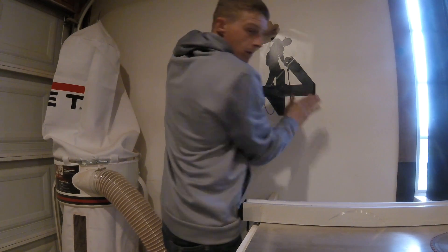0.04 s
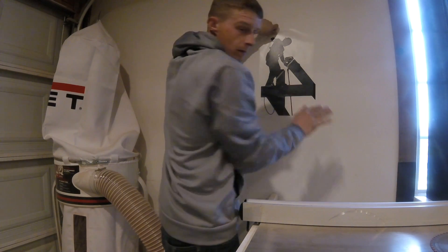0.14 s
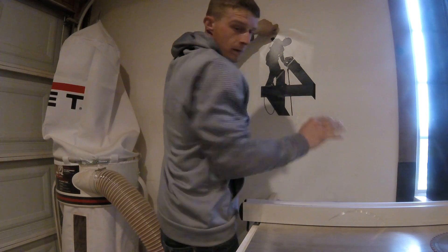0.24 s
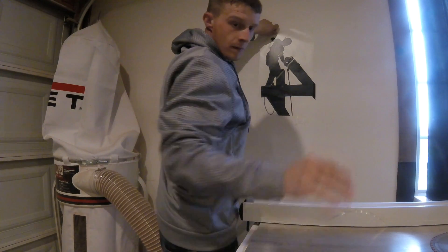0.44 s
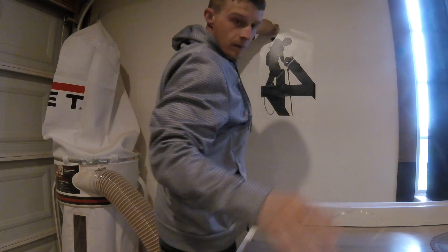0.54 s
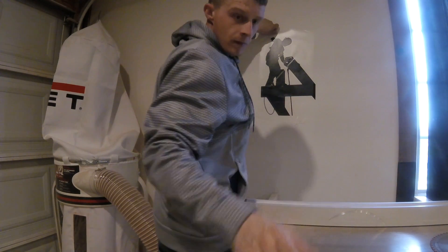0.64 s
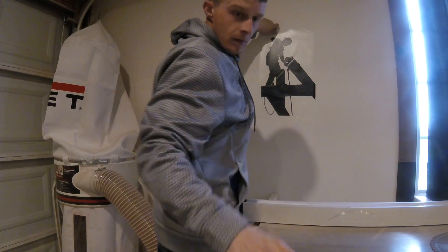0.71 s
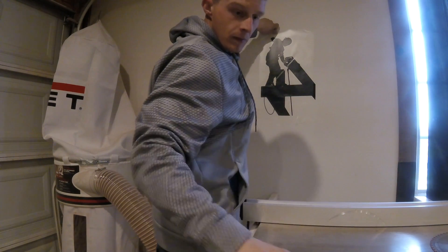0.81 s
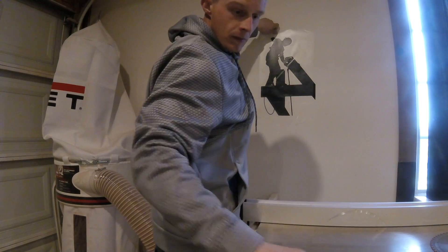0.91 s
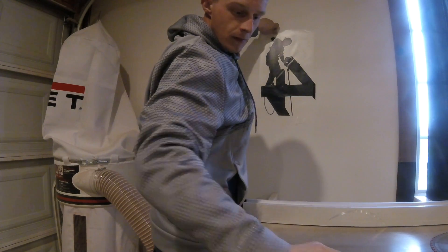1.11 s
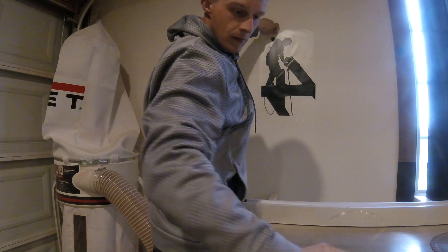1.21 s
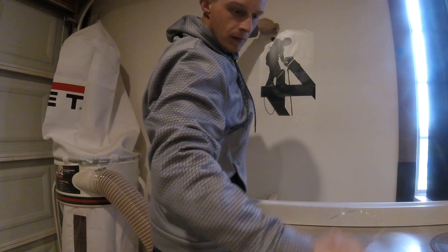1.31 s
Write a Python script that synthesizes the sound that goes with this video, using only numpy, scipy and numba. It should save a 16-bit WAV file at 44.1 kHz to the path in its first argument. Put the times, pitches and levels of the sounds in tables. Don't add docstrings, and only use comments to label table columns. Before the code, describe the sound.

One hollow palm slap with a reverberant tail comes first, then near the end crackling stiff paper, a tiny squeak and dull bench knocks, heard close to a small microphone in a humming, echoing garage.

```python
import sys
import numpy as np
from scipy import signal
from scipy.fft import rfft, irfft
from scipy.io import wavfile
from scipy.ndimage import uniform_filter1d
from numba import njit

SR = 44100
rng = np.random.default_rng(int(sys.argv[2]) if len(sys.argv) > 2 else 0)


def convert_level_to_amplitude(level_db):
    exponent = np.asarray(level_db, float) / 20
    return 10 ** exponent


def put_to_file(sound):
    columns = np.atleast_2d(sound).T
    safe = np.clip(columns, -1, 1)
    whole_steps = np.round(safe * 32767)
    wavfile.write(sys.argv[1], SR, whole_steps.astype(np.int16))


N = 59535


def level(x, db):
    return x * convert_level_to_amplitude(db) / np.sqrt(np.mean(x ** 2))


def colour(x, points):
    hz, db = np.array(points, float).T
    f = np.maximum(np.fft.rfftfreq(len(x), 1 / SR), 1)
    gain = convert_level_to_amplitude(np.interp(np.log(f), np.log(hz), db))
    return irfft(rfft(x) * gain, len(x))


def band(x, hz, width_hz):
    return signal.lfilter(*signal.iirpeak(hz, hz / width_hz, fs=SR), x)


def walk(rate):
    hold = int(SR / rate)
    steps = np.repeat(rng.standard_normal(N // hold + 1), hold)
    wander = uniform_filter1d(uniform_filter1d(steps, hold), hold)[:N]
    return wander / wander.std()


@njit
def rings(n, at, hz, t60, size, sr):
    out = np.zeros(n)
    for k in range(len(at)):
        first = int(at[k] * sr) + 1
        turn = np.exp((2j * np.pi * hz[k] - np.log(1000.) / t60[k]) / sr)
        z = size[k] * turn ** (first - at[k] * sr)
        for i in range(first, min(n, first + int(t60[k] * sr))):
            out[i] += z.imag
            z *= turn
    return out


def strikes(rows):
    start, db, hz, t60 = np.array(rows, float).T
    return rings(N, start, hz, t60, convert_level_to_amplitude(db), 1. * SR)


# start in seconds, peak in dB, ring in Hz, t60 in seconds.
SLAP_CONTACTS = [(.1905, -30.5, 300, 0.055), (0.2027, -29, 700, 0.022), (.2035, -17.5, 1340, 0.018),
                 (0.203, -26.5, 600, 0.066), (.2085, -18.5, 808, 0.038), (.2105, -18.5, 1253, 0.049),
                 (0.2121, -14, 1850, 0.015), (.2138, -24, 1320, 0.012), (.2155, -21, 1585, 0.02),
                 (0.2164, -16, 1450, 0.031), (.2205, -39, 1010, 0.016), (.2060, -28.5, 370, 0.21)]
# ring in Hz, level in dB, t60 in seconds.
HAND_HOLLOWS = [(265, -13.5, 0.027), (370, -12, 0.023), (600, -10.5, 0.032), (894, 0.5, 0.027),
                (1080, -8.5, 0.0081), (1366, 5, 0.021), (1623, 3, 0.016), (2100, -8.5, .012),
                (2383, -6, 0.015), (3080, -6, 0.0078), (3975, -12.5, 0.008), (6480, -11.5, 0.0016)]
# pitch in Hz, peak in dB, start in seconds, rise in seconds.
ROOM_BOOMS = [
    (89.6, -38.5, 0.208, 0.051),
    (148, -38, 0.231, 0.039),
    (386.8, -41, 0.212, 0.04),
    (97.3, -44.5, .32, 0.027),
]


def slap(t):
    crack_hz, crack_width_hz, crack_db = 2600, 1530, -31.5
    crack_s, crack_rise_s = 0.1976, 0.014
    u = np.maximum(t - crack_s, 0) / crack_rise_s
    air = band(rng.standard_normal(N), crack_hz, crack_width_hz)
    air = band(air, crack_hz, 2 * crack_width_hz)
    crack = convert_level_to_amplitude(crack_db) * level(air, 0) * u * np.exp(1 - u)

    walls_s, walls_db = 0.207, -27.5
    walls = np.zeros(N)
    for hz, db, t60 in HAND_HOLLOWS:
        hollow = strikes([(walls_s, db, hz, t60)])
        walls += signal.fftconvolve(hollow, room(t))[:N]
    early = walls[int(.25 * SR):int(.3 * SR)]
    walls = walls * convert_level_to_amplitude(walls_db) / early.std()

    x = strikes(SLAP_CONTACTS) + crack + walls
    x = signal.sosfilt(signal.butter(3, [163, 7800], "band", fs=SR, output="sos"), x)
    for hz, db, start, rise in ROOM_BOOMS:
        v = np.maximum(t - start, 0) / rise
        x = x + convert_level_to_amplitude(db) * (v * np.exp(1 - v)) ** 2 * np.sin(2 * np.pi * hz * t)
    return x


# time in seconds, level in dB, tilt in dB either side of 2 kHz.
PAPER_DRAG = [(1.038, -58, 6), (1.085, -50, 3.5), (1.11, -44.5, 6), (1.148, -45, 5), (1.175, -47.5, 4),
              (1.206, -49, 7), (1.26, -42, -0.5), (1.288, -56, -9), (1.35, -47.5, -3)]
# frequency in Hz, gain in dB.
PAPER_COLOUR = [(200, -3), (300, -0.5), (880, -5), (1080, 0), (1900, -1.5), (3900, -4.5), (4900, -12.5),
                (9000, -18)]


def paper(t):
    start, db, tilt = np.array(PAPER_DRAG).T
    drag = convert_level_to_amplitude(np.interp(t, start, db, left=-120)) * np.clip((t - start[0]) / 0.032, 0, 1)

    grains_per_s, grain_spread_db, grain_cycles = 1200, 3, 1.1
    when, pitch, size, sign = rng.random((int(grains_per_s * N / SR), 4)).T
    hz = 500 * 2 ** (4.1 * pitch)
    size = convert_level_to_amplitude(-grain_spread_db * np.log(size + 1e-6)) * np.sign(sign - .5) * hz / 2000
    grains = rings(N, when * N / SR, hz, 3 * grain_cycles / hz, size, 1. * SR)

    scrape_db, flicker_db = 9, 0.8
    raw = level(grains, 0) + level(rng.standard_normal(N), scrape_db)
    raw = level(colour(raw, PAPER_COLOUR), 0) * convert_level_to_amplitude(flicker_db * walk(59.3))
    low = signal.lfilter(*signal.butter(1, 2000, fs=SR), raw)
    lean = np.interp(t, start, tilt)
    x = drag * (low * convert_level_to_amplitude(-lean) + (raw - low) * convert_level_to_amplitude(lean)) + creases(t)
    return signal.sosfilt(signal.butter(3, 8100, fs=SR, output="sos"), x)


# start in seconds, peak in dB, pitch in Hz, t60 in seconds.
PAPER_CREASES = [(1.084, -43, 1070, 0.0076), (1.105, -41, 3600, 0.0055), (1.111, -37, 2230, 0.005),
                 (1.128, -33, 2440, .005), (1.138, -32, 2600, 0.0056), (1.146, -36, 2180, 0.0051),
                 (1.149, -33, 1090, 0.018), (1.2005, -31, 3270, .006), (1.2035, -34, 1130, 0.017),
                 (1.244, -32, 3400, 0.0057), (1.255, -31, 3860, 0.0085), (1.261, -33, 6800, .004),
                 (1.271, -40, 3720, 0.0037), (1.297, -29.5, 1760, .007), (1.3016, -28.5, 2260, 0.0054),
                 (1.312, -36, 3020, 0.0056), (1.322, -33.5, 3240, 0.0031), (1.339, -30.5, 1770, 0.0036),
                 (1.346, -35.5, 1040, 0.015)]


def creases(t):
    ring_db, tear_db = -1.5, -15
    air = rng.standard_normal(N)
    tears = np.zeros(N)
    for start, db, hz, t60 in PAPER_CREASES:
        tear = band(band(air, hz, hz / 1.3), hz, hz)
        tears += level(tear, db) * np.exp(-((t - start) / (0.68 * t60)) ** 2)
    return convert_level_to_amplitude(ring_db) * strikes(PAPER_CREASES) + convert_level_to_amplitude(tear_db) * tears


# start in seconds, peak in dB, pitch in Hz, t60 in seconds.
BENCH_KNOCKS = [
    (1.237, -36, 115.4, .12),
    (1.266, -38.5, 97, 0.079),
    (1.338, -36.5, 277, 0.047),
]


def knocks():
    return strikes(BENCH_KNOCKS)


# start in seconds, length in seconds, pitch in Hz, level in dB.
EDGE_SQUEAK = (1.206, .028, 1900, -41)


def squeak(t):
    start, length, hz, db = EDGE_SQUEAK
    swell = np.sin(np.pi * np.clip((t - start) / length, 0, 1))
    return convert_level_to_amplitude(db) * swell * np.sin(2 * np.pi * hz * t + .4 * walk(60))


# start in seconds, length in seconds, centre in Hz, width in Hz, level in dB.
SLEEVE_BRUSHES = [
    (-.05, 0.21, 2600, 2430, -64.5),
    (0.107, 0.19, 1870, 2860, -56.5),
    (0.972, 0.081, 3460, 600, -63),
    (1.011, 0.048, 2560, 910, -58),
]


def sleeve(t):
    x = np.zeros(N)
    for start, length, hz, width_hz, db in SLEEVE_BRUSHES:
        cloth = band(band(rng.standard_normal(N), hz, width_hz), hz, 2 * width_hz)
        x += level(cloth, db) * np.sin(np.pi * np.clip((t - start) / length, 0, 1))
    return x


# frequency in Hz, t60 in seconds, level in dB.
GARAGE_DECAY = [(90, 0.63, 14), (231, 0.66, 2), (600, 0.91, 5.5), (1360, 0.87, -2), (2580, 0.85, 3.5),
                (4730, 0.81, 10.5), (9800, 0.14, 0.5)]


def room(t):
    build_s = 0.006
    hz, t60, db = np.log(np.array(GARAGE_DECAY).T[0]), *np.array(GARAGE_DECAY).T[1:]
    tail = np.zeros(N)
    for f in 60 * 2 ** np.arange(0, 7.9, .5):
        band_db = np.interp(np.log(f), hz, db)
        band_t60 = np.interp(np.log(f), hz, t60)
        tail += convert_level_to_amplitude(band_db - 60 * t / band_t60) * band(rng.standard_normal(N), f, f / 1.73)
    tail = tail * (1 - np.exp(-t / build_s))
    return tail / np.sqrt(np.sum(tail ** 2))


# pitch in Hz, rms in dB, beats per second, loudest moment in seconds,
# beat depth from 0 to 1.
HUM_LINES = [(37.8, -52, 4.5, .8, 0), (42.7, -63, 4.6, 3.2, .5), (88.5, -65.5, 6.1, 1.4, 0.9),
             (127.9, -56, 2.2, .61, 0.8), (179.1, -65.5, 0.9, 0.023, 1)]


def hum(t):
    wander = 0.008
    load_s, unloaded_db = 0.48, -7.5
    load = convert_level_to_amplitude(unloaded_db / (1 + np.exp((t - load_s) / 0.034)))
    x = np.zeros(N)
    for k, (hz, db, beat_hz, loudest_s, depth) in enumerate(HUM_LINES):
        phase = 2 * np.pi * np.cumsum(hz * (1 + wander * walk(9.3))) / SR
        beat = 1 + depth * np.cos(2 * np.pi * beat_hz * (t - loudest_s))
        line = convert_level_to_amplitude(db) * np.sqrt(2) * beat * np.sin(phase)
        x += line * load if k == 3 else line
    return x


# frequency in Hz, gain in dB.
FLOOR_COLOUR = [(25, -6), (130, -8), (320, -20.5), (1360, -26.5), (4800, -40.5), (6670, -29.5),
                (10000, -38), (12500, -41.5)]


def floor():
    air = colour(rng.standard_normal(N), FLOOR_COLOUR)
    hiss = signal.sosfilt(signal.butter(4, 200, "high", fs=SR, output="sos"), air)
    return air * convert_level_to_amplitude(-58.5) / hiss.std()


def scene():
    t = np.arange(N) / SR
    sheet = paper(t) + knocks()
    wet = convert_level_to_amplitude(-11.5) * signal.fftconvolve(sheet, room(t))[:N]
    return (slap(t) + sheet + wet + squeak(t) + sleeve(t) + hum(t) + floor())[None]


def band_limit(x):
    return signal.sosfilt(signal.butter(12, 14330, fs=SR, output="sos"), x)


def record(dry):
    x = dry + convert_level_to_amplitude(1.5) * band(dry, 6520, 380)
    x = signal.sosfilt(signal.butter(8, 13460, fs=SR, output="sos"), x)
    return band_limit(x)


dry = scene()
out = record(dry)
put_to_file(out)
```